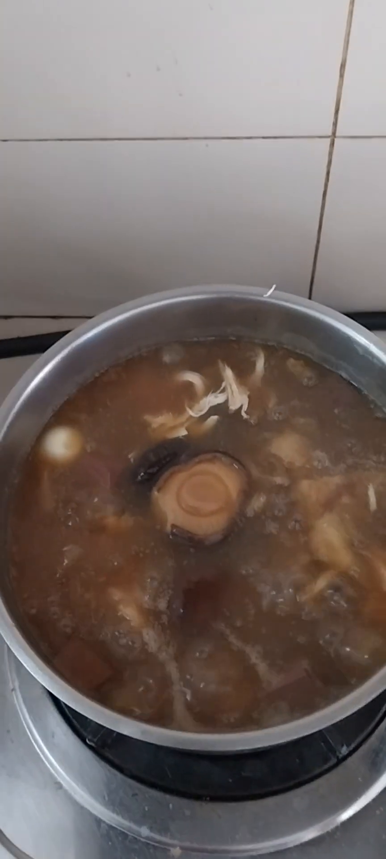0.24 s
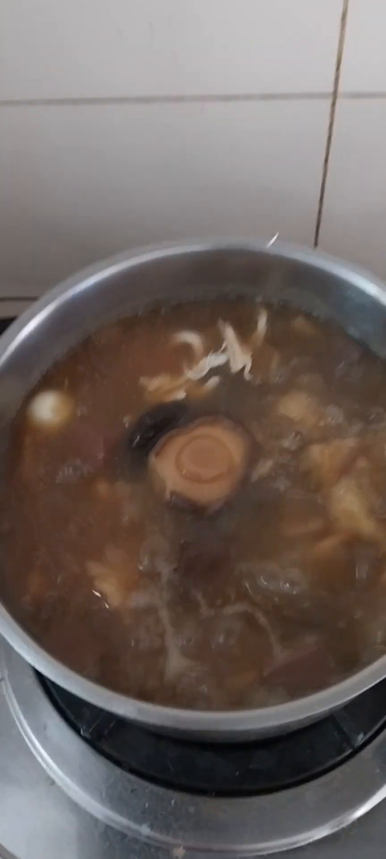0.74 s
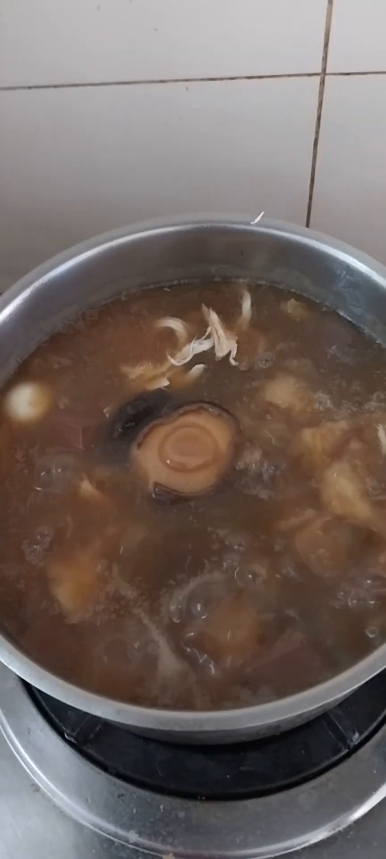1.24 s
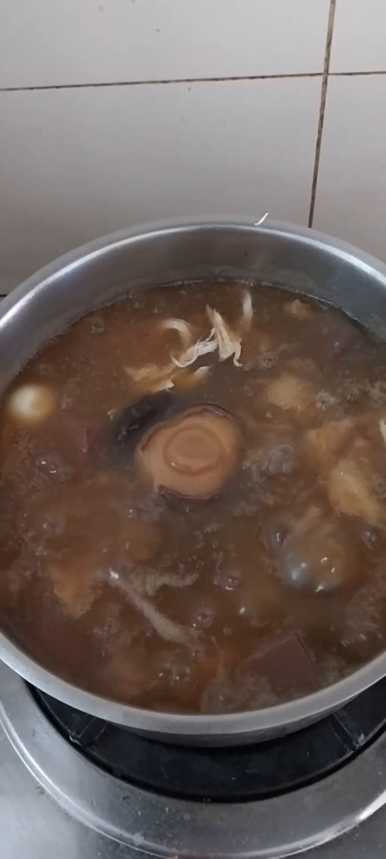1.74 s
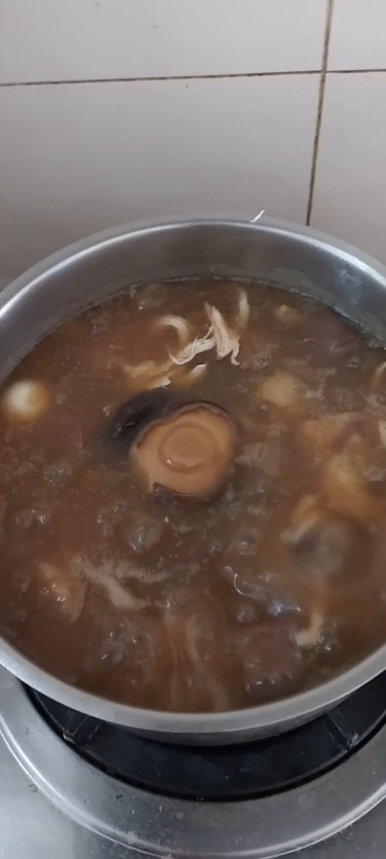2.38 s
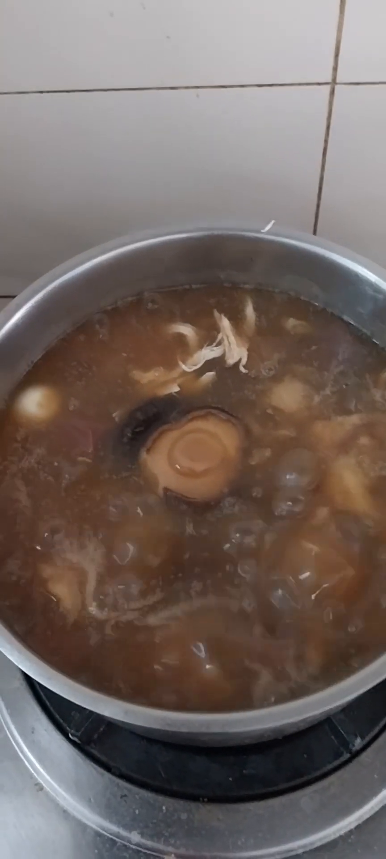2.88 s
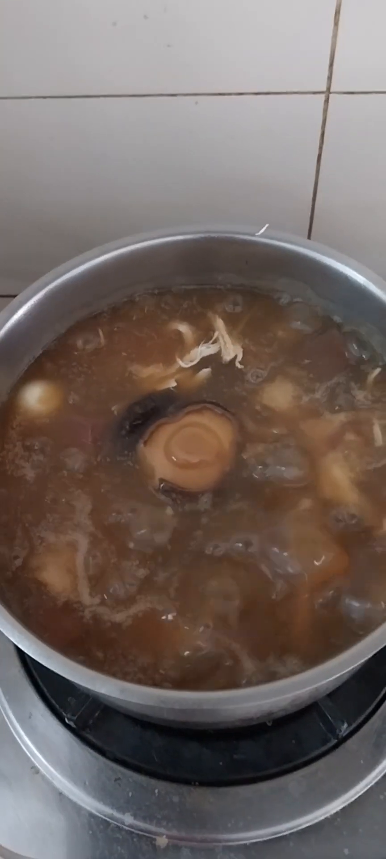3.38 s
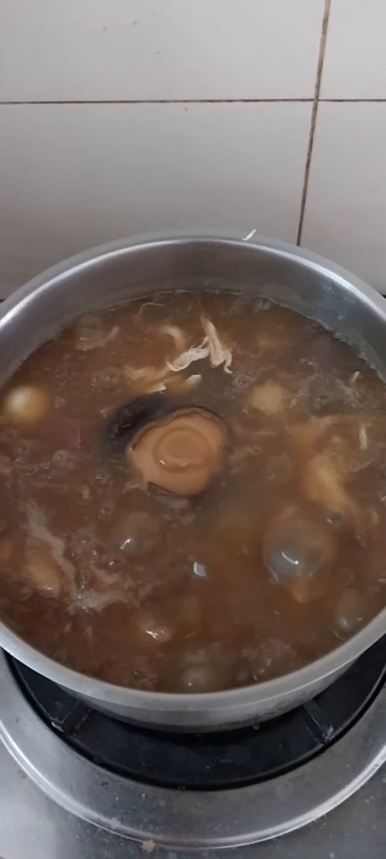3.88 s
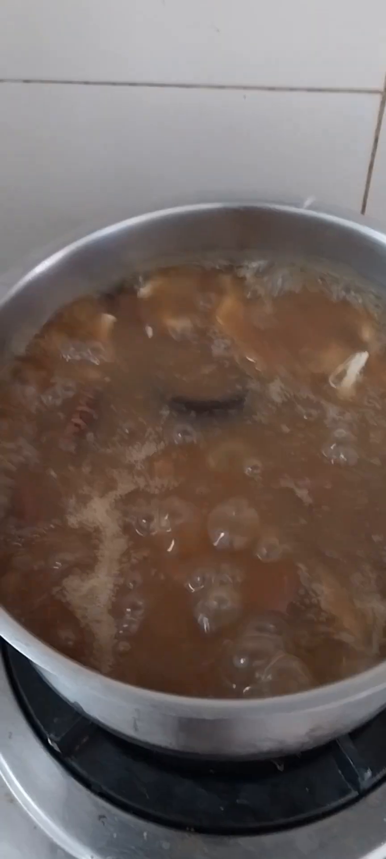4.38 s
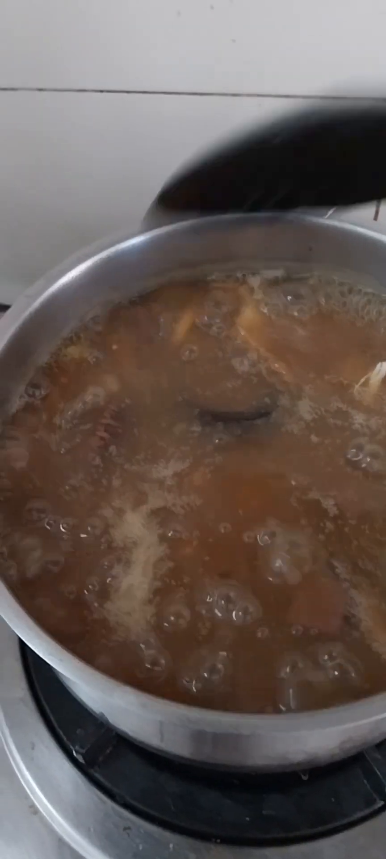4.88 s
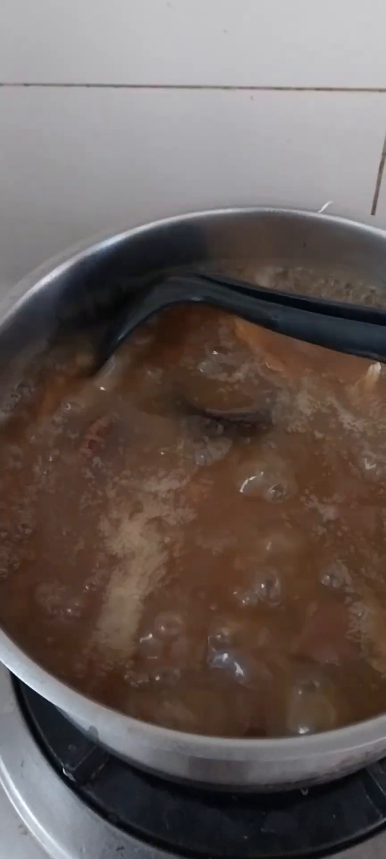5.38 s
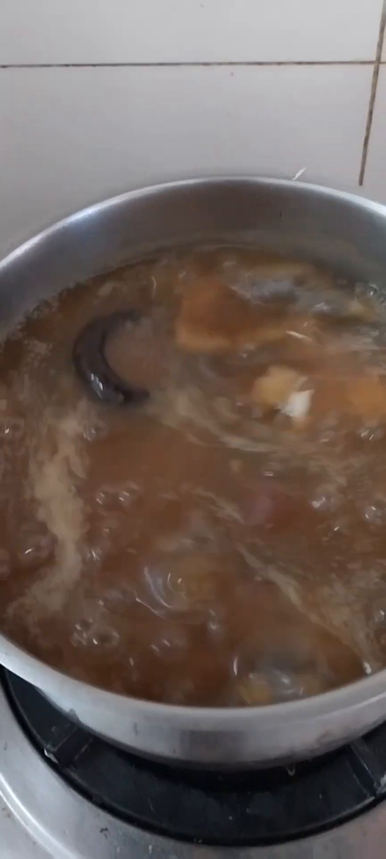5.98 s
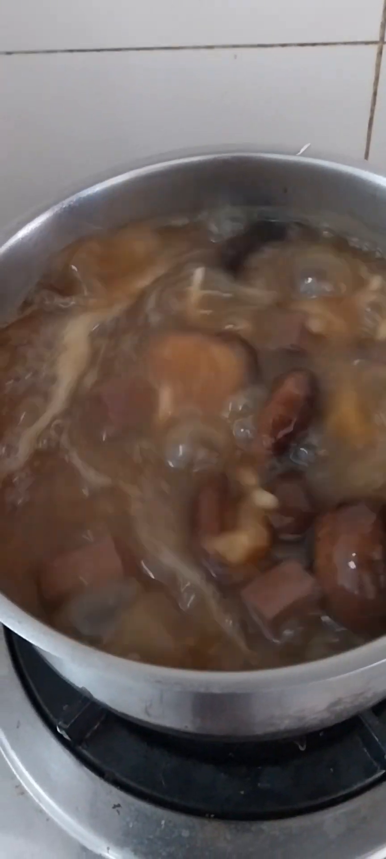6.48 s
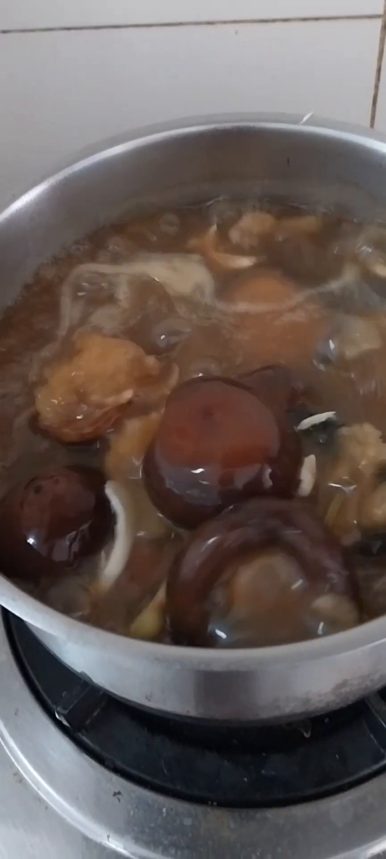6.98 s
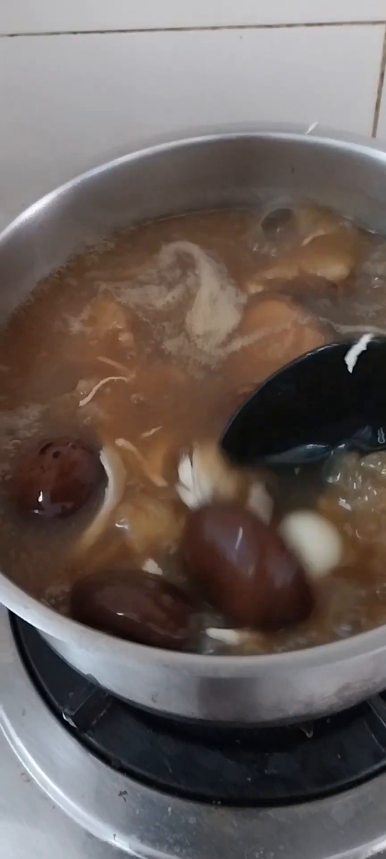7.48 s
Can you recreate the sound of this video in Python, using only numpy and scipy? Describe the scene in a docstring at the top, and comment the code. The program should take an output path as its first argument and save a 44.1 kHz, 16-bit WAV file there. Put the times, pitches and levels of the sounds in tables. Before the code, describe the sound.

Low pot rumble, glugging bubbles and crackling froth over thin gas hiss, a brief ladle clatter, then vigorous bubbling and gurgling stirs.

```python
"""Thick soup on a gas burner

A steel pot simmers in a tiled kitchen. The gas jet is banded noise that hisses and whistles over a flame hiss.
The pot rumbles as filtered noise, big bubbles glug, small ones plip and froth crackles, all as short rising tones.
A ladle clatters in decaying modes as it is picked up; then the boil grows stronger
and the ladle stirs in a few strokes that swell wet pops, a gurgle and a low slosh."""
import sys
import numpy as np
from scipy import signal
from scipy.fft import rfft, irfft
from scipy.io import wavfile

SR = 44100
rng = np.random.default_rng(int(sys.argv[2]) if len(sys.argv) > 2 else 0)


def dump(signal):
    """Clip the signal to [-1, 1] and save it as 16-bit WAV at the path in sys.argv[1]."""
    limited = np.clip(np.atleast_2d(signal).T, -1, 1)
    pcm = np.round(limited * 32767).astype(np.int16)
    wavfile.write(sys.argv[1], SR, pcm)


N = 341334
TIME = np.arange(N) / SR
HZ = np.fft.rfftfreq(N, 1 / SR)


def amp(db):
    """Decibels to gain."""
    return 10 ** (np.asarray(db) / 20)


def evened(x):
    """Scales to rms 1."""
    return x / np.sqrt(np.mean(x ** 2) + 1e-20)


def read(points, hz):
    """Reads a table on a log-frequency axis."""
    f, value = np.transpose(points)
    return np.interp(np.log(hz + 1), np.log(f + 1), value)


def curve(points):
    """A control curve, sample by sample."""
    return np.interp(TIME, *np.transpose(points))


def panned(db):
    """Left and right gains for a level difference; positive leans left."""
    gains = amp(np.array([[db], [-db]]) / 2)
    return evened(gains)


def add(mix, s, sound):
    """Mixes a sound in at time s."""
    start = max(round(s * SR), 0)
    part = mix[..., start:][..., :sound.shape[-1]]
    part += sound[..., :part.shape[-1]]


def humps(modes):
    """Gain over frequency of a set of steep-sided resonances."""
    power = 0
    for hz, width, db in modes:
        offset = (HZ - hz) / (0.55 * width)  # width is roughly the full width at half amplitude
        power = power + amp(db) ** 2 / (1 + offset ** 2) ** 2
    return np.sqrt(power)


# Likeness of the two microphones. Each row: frequency in Hz, likeness from 0 to 1.
MIC_LIKENESS = [(30, 0.94), (230, 0.92), (380, 0.87), (520, 0.22), (1200, 0.18), (2500, 0.11), (16000, 0)]


def paired(z, hz):
    """Makes two unrelated spectra alike in the bass, as at two close microphones."""
    same = np.clip(read(MIC_LIKENESS, hz), 0, 1)
    return np.array([z[0], same * z[0] + np.sqrt(1 - same ** 2) * z[1]])


def noise(gain):
    """Stereo noise of rms 1 with the given spectrum."""
    white = rfft(rng.standard_normal((2, N)))
    return evened(irfft(paired(white, HZ) * gain, N))


def flutter(depth_db, rate):
    """A random gain that wanders by depth_db rms, mostly slower than rate in Hz."""
    white = rfft(rng.standard_normal(N))
    wander = evened(irfft(white / (1 + (HZ / rate) ** 4), N))
    return amp(depth_db * wander)


def echoes(x, t60s, size=20000):
    """Dense reflections of energy 1; each band dies at its own speed."""
    t, hz = np.arange(size) / SR, np.fft.rfftfreq(size, 1 / SR)
    taps = irfft(paired(rfft(rng.standard_normal((2, size))), hz), size)
    f, at, z = signal.stft(taps, SR, nperseg=256)
    decay = amp(-60 * at / read(t60s, f)[:, None])
    tail = signal.istft(z * decay, SR, nperseg=256)[1][:, :size]
    tail = tail * np.minimum(t / 0.0016, 1)  # soft start
    tail = tail / np.linalg.norm(tail[0])
    return signal.fftconvolve(x.mean(0)[None], tail, axes=1)[:, :N]


def bubble(hz, cycles, rise, onset):
    """A bubble rings for a few cycles, its pitch rising as it opens; peak 1."""
    age = np.arange(int(6 * cycles / hz * SR) + 8) * hz / SR  # in cycles
    ring = np.sin(2 * np.pi * (age + rise * age ** 2 / (2 * (cycles + age))))
    ring = ring * np.exp(-age / cycles) * (1 - np.exp(-(age / onset) ** 2))
    return ring / abs(ring).max()


def swarm(per_s, low_hz, high_hz, cycles, rise, onset, spread_db, tilt_db, width_db, count=36):
    """Many bubbles of random time, size and side, in count pitch steps from low to high; rms 1."""
    out = np.zeros((2, N))
    for place in np.linspace(0, 1, count):
        when, size, side = rng.random((int(per_s * N / SR / count) + 1, 3)).T
        size_db = spread_db * np.minimum(-np.log(1 - size), 3.5)
        height = amp(size_db + tilt_db * place)
        train = np.zeros((2, N))
        train[:, (when * N).astype(int)] = height * amp(np.outer([1, -1], (side - .5) * width_db))
        hz = low_hz * (high_hz / low_hz) ** place
        out += signal.oaconvolve(train, bubble(hz, cycles, rise, onset)[None], axes=1)[:, :N]
    return evened(out)


# Kitchen reverberation. Each row: frequency in Hz, t60 in seconds.
KITCHEN_T60 = [(100, 0.12), (400, 0.28), (1500, 0.49), (5000, 0.31), (15000, 0.058)]


def kitchen(x):
    """The tiled room answers with a dense tail, longest in the middle of the spectrum."""
    return echoes(x, KITCHEN_T60)


# How hard the soup boils. Each row: time in seconds, dB above a gentle simmer.
BOIL_STRENGTH = [(0, -2.5), (2.2, 0), (4.1, 3), (4.4, 7.5), (5.1, 4.5), (5.6, 9), (6.5, 10), (7.74, 5.5)]


def boil_gain(db, follow):
    """A layer's gain: its level at a gentle simmer, plus dB gained per dB of boil."""
    return amp(db + follow * curve(BOIL_STRENGTH))


# Steady hiss of the flame. Each row: frequency in Hz, relative dB per Hz.
FLAME_SPECTRUM = [(30, -7), (300, 23.5), (700, 16.5), (1050, 11.5), (1400, -20), (2000, -13), (2600, -3),
                  (4000, -6.5), (5500, -1.5), (7700, -6), (10000, 0), (14000, -5), (16000, -1.5)]


def flame():
    """Turbulent burning hisses steadily, as shaped noise."""
    return amp(-61) * noise(amp(read(FLAME_SPECTRUM, HZ)))


def drone_and_roar():
    """A low hum of noise and a wavering sine, with a low roar that follows the boil."""
    hum = amp(-54.0) * noise(humps([(60.2, 15, 0)]))
    tone = amp(-48.5) * np.sin(2 * np.pi * 61.2 * TIME) * flutter(0.56, 1.8)
    roar = boil_gain(-55, 1.1) * noise(humps([(98.5, 18.0, -5), (163.4, 6.7, -12.5)]))
    return hum + tone + roar


# Gas jet drive. Each row: time in seconds, reference level of the high whistle in dB.
JET_LEVEL = [(0, -64), (0.81, -61), (1.8, -68), (4.0, -67), (4.35, -59), (5.1, -60.5), (5.8, -58),
             (7.74, -59.5)]
# Broad jet resonances. Each row: frequency in Hz, width in Hz, relative level in dB.
JET_BROAD = [(6170, 700, -7), (9130, 550, -16.5), (11640, 940, -9), (12390, 850, -1)]
# Narrow jet resonances. Each row: frequency in Hz, width in Hz, relative level in dB.
JET_NARROW = [(6270, 170, -11.5), (12200, 140, -2), (12454, 140, 4), (12720, 130, -17)]
# Burner-tube hiss that barely follows the gas. Each row: frequency in Hz, width in Hz, relative level in dB.
TUBE_STEADY = [(2390, 570, -12), (3025, 200, -1.5), (3112, 47, 3), (3240, 38, 5), (3323, 54, -2.5)]
# Burner-tube tones that grow with the gas. Each row: frequency in Hz, width in Hz, relative level in dB.
TUBE_GROWING = [(3130, 46, -3), (3185, 38, -1.5)]


def gas_jet():
    """As the gas flows faster, the jet's narrow bands outgrow its broad ones and the tube's tones outgrow its hiss."""
    level = amp(curve(JET_LEVEL))
    push = level / level.mean()
    hiss = amp(2.0) * push ** 0.39 * noise(humps(JET_BROAD))
    whistle = amp(-0.5) * push ** 2.28 * noise(humps(JET_NARROW))
    high = level.mean() * (hiss + whistle) * flutter(0.72, 20) * panned(1.0)
    tube_hiss = amp(-65) * push ** 0.2 * noise(humps(TUBE_STEADY))
    tube_tones = amp(-67.5) * push ** 1.76 * noise(humps(TUBE_GROWING))
    return high + (tube_hiss + tube_tones) * flutter(0.49, 4.7) * panned(-5.0)


def whine(count=4):
    """A faint thin whine swells and slides down about once a second during the gentle simmer."""
    start_s, every_s, length_s = 0.52, 1, 0.59
    start_hz, sag_hz_per_s = 12230, 380
    out, t = np.zeros(N), np.arange(0, length_s, 1 / SR)
    phase = 2 * np.pi * np.cumsum(start_hz - sag_hz_per_s * t) / SR
    slide = np.sin(np.pi * t / length_s) * np.sin(phase)
    for k in range(count):
        add(out, start_s + k * every_s, slide)
    return amp(-74) * out * flutter(2.5, 36)


# Knocks as the ladle is picked up. Each row: start in seconds, ring level in dB and clack level in dB
# (both before the trims below), place struck from 0 (handle) to 1 (bowl).
LADLE_KNOCKS = [(2.756, -38.5, -46, 0.06), (2.774, -37.5, -48.5, 0), (2.783, -33, -63, 0),
                (2.798, -45, -51, 0.25), (2.817, -39, -51, 0.89), (2.85, -51, -53, 0.7),
                (2.895, -40, -49, 0.5), (2.949, -46, -38, 1), (2.967, -38, -40, 0.89),
                (2.979, -39.5, -54, 0.81), (2.996, -38, -59, 0.8), (3.037, -40.5, -51, 0.78)]
# What the ladle rings with. Each row: frequency in Hz, relative dB struck on the handle,
# relative dB struck on the bowl, t60 in seconds.
LADLE_MODES = [(226, -1.5, -1, 0.17), (297, 3.5, 2.5, 0.19), (346.8, -4, 5, 0.28), (447, -3, -0.5, 0.16),
               (655, -5, 4, 0.097), (753, 4.5, -2, 0.17), (860, -9, -6, 0.18), (1180, -8.5, -13, 0.1),
               (1480, -29, -16, 0.088), (1530, -2.5, -24, 0.19), (1600, -24, -11, 0.22),
               (2086, -9, -17, .1), (2410, -4, -13, .13), (2760, -3, -22, 0.079), (5900, -4, -16, 0.074)]
# Colour of the clack. Each row: frequency in Hz, relative dB per Hz.
CLACK_SPECTRUM = [(200, 0), (950, -4), (1350, 2), (2200, -5), (3500, -12.5), (5000, -16.5), (6500, -15),
                  (8000, -29), (9700, -11), (11000, -22), (16000, -34)]


def ladle():
    """Each knock is a short noise clack and metal modes whose strengths depend on the place struck."""
    rings, clacks, t = np.zeros((2, N)), np.zeros((2, N)), np.arange(SR // 3) / SR
    hz, handle_db, bowl_db, t60 = np.transpose(LADLE_MODES)[:, :, None, None]
    for s, ring_db, clack_db, place in LADLE_KNOCKS:
        phases = rng.uniform(0, 2 * np.pi, hz.shape) + rng.normal(0, 0.72, (len(hz), 2, 1))
        grip = rng.normal(1, 0.0093, hz.shape)  # the shifting grip detunes each mode a little
        softness_db = max(ring_db - clack_db, 0)
        dull_db = 0.31 * softness_db * np.log2(np.maximum(hz / 750, 1))  # soft blows spare the high modes
        mode_db = handle_db + place * (bowl_db - handle_db) - dull_db
        modes = amp(mode_db - 60 * t / t60) * np.sin(2 * np.pi * hz * grip * t + phases)
        ring = np.sum(modes, axis=0) * (1 - np.exp(-t / 0.0018))
        add(rings, s, amp(ring_db - 5.5) * ring)
        clack = rng.standard_normal((2, len(t))) * np.exp(-t / 0.0065) * (1 - np.exp(-t / 0.0012))
        add(clacks, s, amp(clack_db + 15.5) * clack)
    rings = rings * flutter(2.7, 66)  # it chatters against the counter as it rings
    clacks = irfft(rfft(clacks) * amp(read(CLACK_SPECTRUM, HZ)), N)
    return rings + clacks + amp(-0.5) * kitchen(clacks) + amp(-3) * kitchen(rings)


# Pot resonances. Each row: frequency in Hz, width in Hz, relative level in dB.
POT_MODES = [(92.8, 21.5, -2), (96, 13.4, 1.5), (159.9, 19.3, -2), (200.6, 19, -11.5), (220, 16, -16),
             (256.3, 25, -12), (327, 30, -12), (351.8, 34.3, -8)]


def pot_rumble():
    """Steam collapsing on the pot's floor makes it rumble: noise through its resonances."""
    return boil_gain(-47, 0.19) * noise(humps(POT_MODES)) * flutter(1.0, 32)


# Wash of the boiling soup. Each row: frequency in Hz, relative dB per Hz.
WASH_SPECTRUM = [(30, -33), (70, -0.5), (130, -3.5), (200, -0.5), (340, -3), (430, -7.5), (560, -4),
                 (700, -16), (900, -15.5), (1300, -26), (2000, -43.5), (5000, -51)]


def wash():
    """The boiling soup churns as dull, uneven noise."""
    return boil_gain(-55.5, 0.79) * noise(amp(read(WASH_SPECTRUM, HZ))) * flutter(3.33, 17.5)


def gulps():
    """A dense swarm of low bubbles breaks on top, following the boil."""
    bubbles = swarm(130, 153.6, 977, cycles=1.68, rise=0.15, onset=0.76,
                    spread_db=4.0, tilt_db=-14.0, width_db=14.0)
    return boil_gain(-59.5, 0.79) * bubbles


def froth():
    """Tiny bubbles crackle and fizz over a fluttering sizzle, growing steeply with the boil."""
    crackle = swarm(340, 1915, 5000, cycles=1.7, rise=0.12, onset=0.22,
                    spread_db=5.0, tilt_db=8.5, width_db=31.0) * panned(-4)
    fizz = swarm(160, 5200, 16000, cycles=0.8, rise=0.083, onset=0.2,
                 spread_db=-0.5, tilt_db=20.5, width_db=38)
    sizzle = noise(humps([(2780, 2050, 0)])) * flutter(4.14, 26) * panned(-25)
    return boil_gain(-78.5, 1.15) * (amp(5) * crackle + amp(3) * fizz + amp(2.5) * sizzle)


# Hollow of the pot. Each row: frequency in Hz, gain in dB, t60 in seconds.
HOLLOW_MODES = [(164, -3, 0.15), (201, -10.5, 0.29), (226, -10, 0.21), (274, -9, 0.15), (307, -5.5, 0.17),
                (369.5, 5, 0.07), (520, -10, 0.075)]


def hollow():
    """Impulse response of the air and soup inside the pot; the factor brings its modes near their gains."""
    t = np.arange(SR // 6) / SR
    response = np.zeros(len(t))
    for hz, db, t60 in HOLLOW_MODES:
        mode = amp(db - 60 * t / t60) * np.sin(2 * np.pi * hz * t)
        response += mode * 2 * np.log(1000) / (t60 * SR)
    return response


# Big bubbles. Each row: start in seconds, peak in dB before the trims below, starting pitch in Hz.
BIG_BUBBLES = [(0.33, -35, 320), (0.726, -26.5, 170), (0.735, -34.5, 300), (1.299, -36.5, 324),
               (1.48, -32.5, 300), (1.738, -35, 172), (1.892, -31.5, 159), (1.983, -34.5, 166),
               (2.379, -36, 350), (3.462, -32, 152), (3.549, -32.5, 355), (4.17, -36, 177),
               (4.341, -35, 130), (4.444, -34, 104), (4.631, -38.5, 336), (4.939, -34, 159),
               (5.478, -31, 147), (5.559, -34.5, 120), (5.687, -21.5, 262), (5.899, -31.5, 158),
               (6.165, -33, 254), (6.25, -29.5, 159), (6.282, -27, 213), (6.345, -27, 356),
               (6.463, -28.5, 153), (6.722, -35, 160), (6.871, -34.5, 234), (7.254, -35, 108),
               (7.367, -33, 170), (7.633, -35.5, 226)]


def glugs():
    """Big bubbles ring low and set off the hollow of the pot."""
    out = np.zeros(N)
    for s, db, hz in BIG_BUBBLES:
        add(out, s, amp(db) * bubble(hz, cycles=1.46, rise=0.11, onset=0.31))
    return amp(-4.5) * out + amp(-3) * signal.oaconvolve(out, hollow())[:N]


def tear():
    """A film gives way in one broad tick."""
    return bubble(2760, cycles=0.57, rise=.1, onset=0.23)


# Small bubbles. Each row: start in seconds, peak in dB before panning, starting pitch in Hz,
# left-right difference in dB.
SMALL_BUBBLES = [(0.919, -44.5, 820, 9), (0.999, -36, 846, 11), (1.466, -47, 795, 15), (1.483, -35, 540, 2),
                 (1.485, -47, 1000, 0), (1.733, -43, 745, 13), (4.258, -43.5, 740, 10),
                 (4.508, -40, 840, 11), (4.885, -35, 800, 5), (5.329, -37.5, 1100, 13), (5.38, -43, 704, 1),
                 (5.4, -32.5, 810, 11), (5.653, -34.5, 855, 13), (5.895, -43, 613, 3),
                 (6.182, -37, 626, -1), (6.285, -38, 690, 6), (6.304, -33.5, 544, -6),
                 (6.464, -32.5, 524, 2), (6.593, -39.5, 655, -5), (6.933, -37, 800, 14)]


def plips():
    """Small bubbles ring briefly, each with a centred tick and a wet splash of noise."""
    splash_db, tick_db = -11.5, -12  # relative to the ring
    out, wet, t = np.zeros((2, N)), np.zeros((2, N)), np.arange(SR // 4) / SR
    for s, db, hz, side_db in SMALL_BUBBLES:
        add(out, s, amp(db) * panned(side_db) * bubble(hz, cycles=2.06, rise=0.11, onset=0.59))
        add(out, s, amp(db + tick_db) * tear())
        add(wet, s, amp(db + splash_db) * panned(side_db) * np.exp(-t / 0.0067))
    return out + wet * noise(humps([(885, 440, 0)]))


# Bursting films. Each row: start in seconds, peak in dB before panning, starting pitch in Hz,
# left-right difference in dB.
FILM_BURSTS = [(0.6097, -37, 2970, -2), (0.9993, -45, 1640, 1), (1.32, -40, 3130, -13),
               (1.3438, -39, 3200, -6), (1.545, -42, 3250, 2), (2.0015, -39.5, 3240, -6),
               (2.1318, -41.5, 3460, -14), (2.272, -41, 3000, -16), (2.4238, -35.5, 4150, -7),
               (2.4444, -32.5, 2560, -26), (1.495, -46, 4700, -3), (3.495, -40.5, 2820, -9),
               (3.8681, -37.5, 4500, -8), (4.048, -38.5, 3220, -3), (4.2882, -43, 2080, -3),
               (4.32, -36.5, 1760, 1), (4.442, -41, 3320, -15), (4.492, -41, 3400, -8),
               (4.5656, -37, 4700, 5), (4.63, -40, 4500, -4), (4.718, -32.5, 3190, 0),
               (5.236, -37.5, 2230, -13), (5.282, -32, 3120, -8), (5.3293, -40, 1900, -11),
               (5.654, -30, 2900, -20), (5.672, -38, 3100, -13), (5.716, -35.5, 3200, -15),
               (5.7357, -35.5, 3070, -8), (6.118, -35.5, 1680, 0), (6.183, -35, 3200, -16),
               (6.2243, -37, 2460, -2), (6.3096, -31.5, 2790, -14), (6.4733, -34, 5000, 14),
               (6.483, -25.5, 2760, -19), (6.508, -33.5, 2820, -17), (6.545, -26, 3250, -5),
               (6.98, -39.5, 2820, -19), (7.063, -38, 2170, -18)]


def snaps():
    """A tearing film snaps as a tiny high ring and a slightly later tick; also gives its spray envelope."""
    tick_db, spray_db, spray_decay_s = -17, -17, 0.0018  # levels relative to the ring
    out, envelope, t = np.zeros((2, N)), np.zeros((2, N)), np.arange(SR // 4) / SR
    for s, db, hz, side_db in FILM_BURSTS:
        size = amp(db) * panned(side_db)
        add(out, s, size * bubble(hz, cycles=1.32, rise=0.053, onset=0.33))
        add(out, s + 0.00073, size * amp(tick_db) * tear())
        add(envelope, s, size * amp(spray_db) * np.exp(-t / spray_decay_s))
    return out, envelope


# Drops that spit on the hot wall of the pot. Each row: start in seconds, level in dB before
# the spray colouring, decay to 1/e in seconds.
HOT_DROPS = [(0.611, -56, 0.023), (0.999, -51, 0.0028), (1.327, -62, 0.019), (1.995, -63, 0.025),
             (2.444, -48, 0.002), (2.517, -41, 0.002), (2.522, -57, 0.07), (3.3035, -48, 0.002),
             (3.471, -48, 0.002), (3.592, -45, 0.0023), (4.0483, -48.5, 0.0018), (4.794, -44, 0.002),
             (6.2245, -44, 0.002), (7.3915, -41, 0.0018)]


def spits():
    """Spray envelope of drops that spit on hot metal: instant start, exponential decay."""
    envelope, t = np.zeros((2, N)), np.arange(SR // 4) / SR
    for s, db, decay in HOT_DROPS:
        add(envelope, s, amp(db) * np.exp(-t / decay))
    return envelope


def spray(envelope):
    """Fine droplets: noise under the envelope, coloured bright."""
    colour = humps([(4300, 3600, 1.0), (10550, 4800, 4)])
    return irfft(rfft(envelope * rng.standard_normal((2, N))) * colour, N)


def bursts():
    """Single bubbles that stand out: glugs, plips and snapping films, with spray from films and drops."""
    films, film_spray = snaps()
    return glugs() + plips() + films + spray(film_spray + spits())


# Strokes of the ladle through the soup. Each row: start in seconds, length in seconds, strength in dB.
LADLE_STROKES = [(5.203, 0.31, -3), (5.605, 0.078, 1), (5.817, 0.14, -1), (6.15, 0.21, 3),
                 (6.437, 0.064, 3.5), (6.627, 0.31, -8), (7.256, 0.13, -8)]
# Soup heaving round the ladle. Each row: frequency in Hz, width in Hz, relative level in dB.
SLOSH_MODES = [(96, 18.5, 0), (160, 18, 0), (215, 30, -11.5), (356, 38, -9.5), (496, 87, -16),
               (1100, 320, -31)]


def stirring():
    """Each stroke swells, holds and dies away; it folds in air as wet pops over a gurgle and a low slosh."""
    attack_s, release_s = 0.017, 0.06
    effort = np.zeros(N)
    for start, length, db in LADLE_STROKES:
        age = TIME - start
        release = np.exp(-np.maximum(age - length, 0) / release_s)
        effort += amp(db) * np.clip(age / attack_s, 0, 1) * release
    # layer levels are those at a stroke of 0 dB
    pops = amp(-59.5) * swarm(330, 765, 4100, cycles=1.0, rise=0.066, onset=0.34,
                              spread_db=5.5, tilt_db=-14, width_db=12)
    gurgle = amp(-48.5) * swarm(300, 158.4, 668, cycles=2.5, rise=.1, onset=0.48,
                                spread_db=2.5, tilt_db=-4.5, width_db=9)
    slosh = amp(-44.5) * noise(humps(SLOSH_MODES))
    return effort * slosh, effort * (pops + gurgle)


def across(x, count=6):
    """The sound reaches the right microphone a few samples after the left."""
    return np.array([x[0], np.pad(x[1], (count, 0))[:N]])


def scene():
    """The surface sounds are heard with a short close echo and the longer kitchen reverberation together."""
    gas = flame() + drone_and_roar() + gas_jet() + whine()
    deep = pot_rumble() + wash()
    slosh, splashes = stirring()
    surface = across(gulps() + froth() + bursts() + splashes)
    near = echoes(surface, [(150, 0.082), (1000, 0.057), (10000, 0.072)])  # Hz, t60 in seconds
    reverberation = amp(-2) * near + amp(-6) * kitchen(surface)
    return gas + deep + slosh + ladle() + surface + reverberation


def record(dry):
    """The microphone's bass roll-off, then the band limit."""
    edge_hz = 15850
    thinned = signal.sosfilt(signal.butter(2, 38, "high", fs=SR, output="sos"), dry)
    low_pass = signal.firwin(701, edge_hz, window=("kaiser", 9), fs=SR)
    return signal.oaconvolve(thinned, low_pass[None], "same")


dry = scene()
out = record(dry)
dump(out)
```